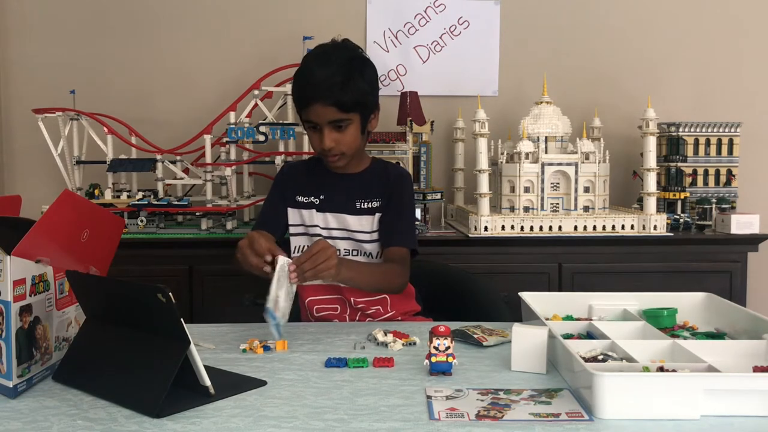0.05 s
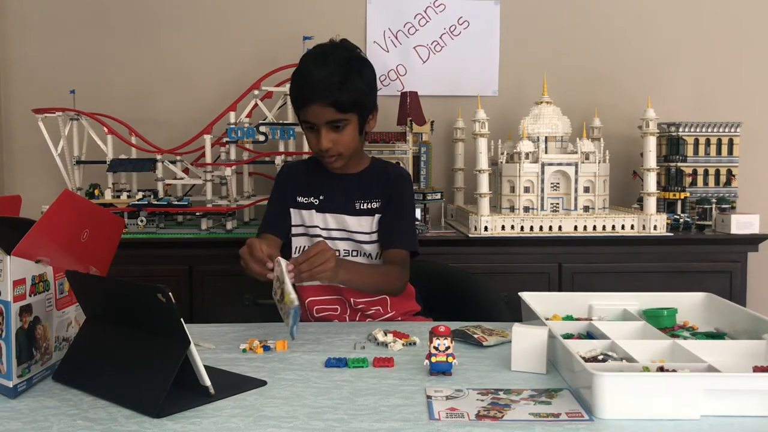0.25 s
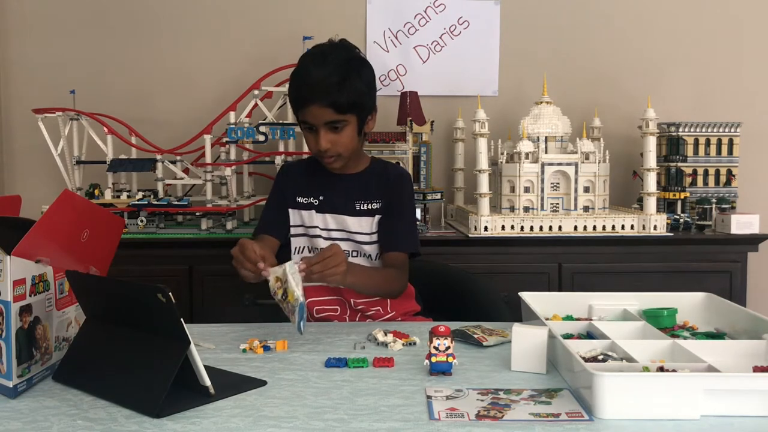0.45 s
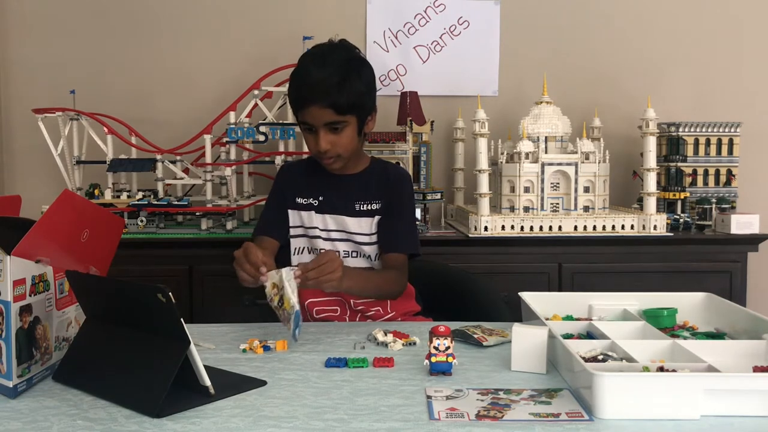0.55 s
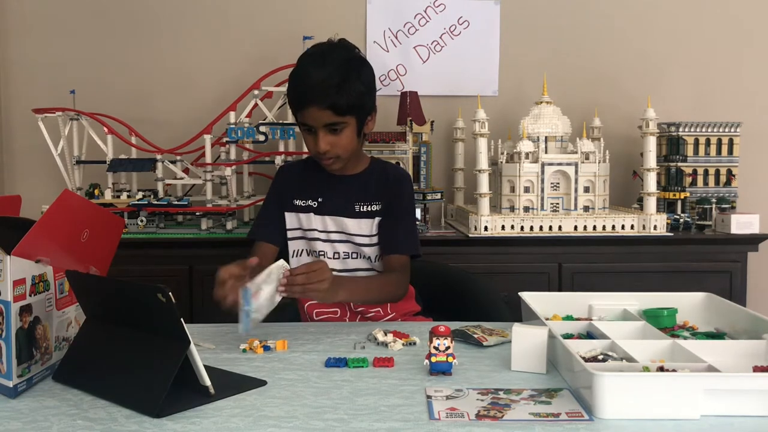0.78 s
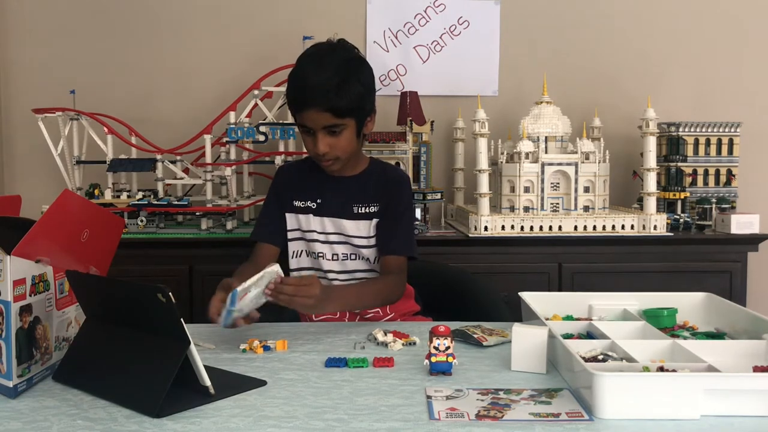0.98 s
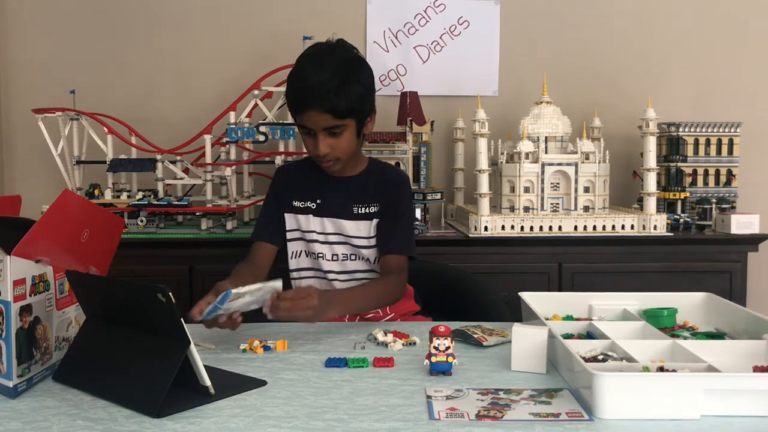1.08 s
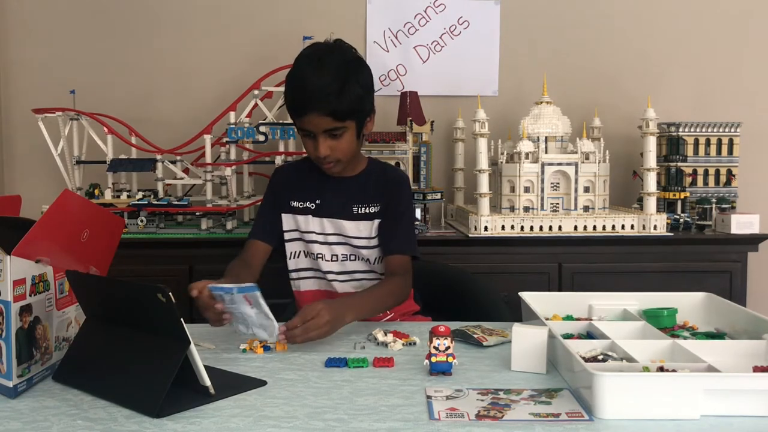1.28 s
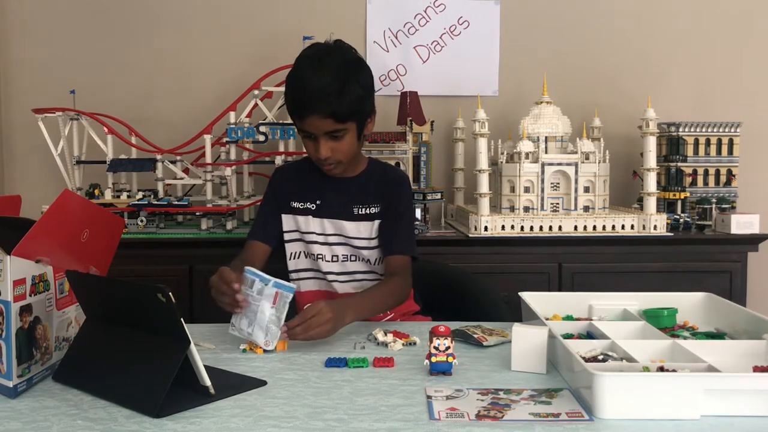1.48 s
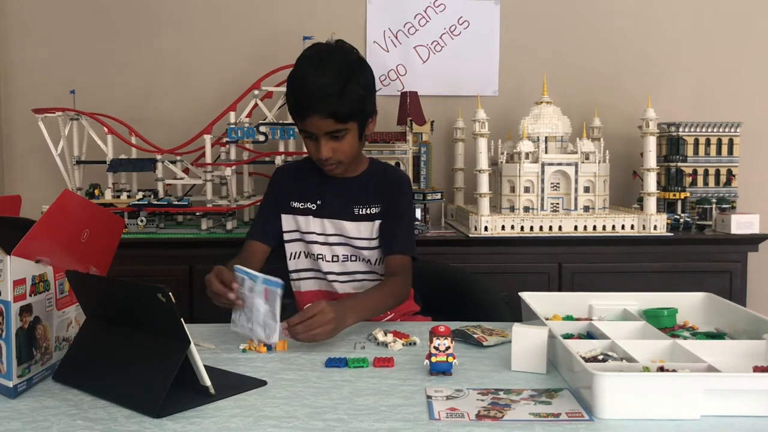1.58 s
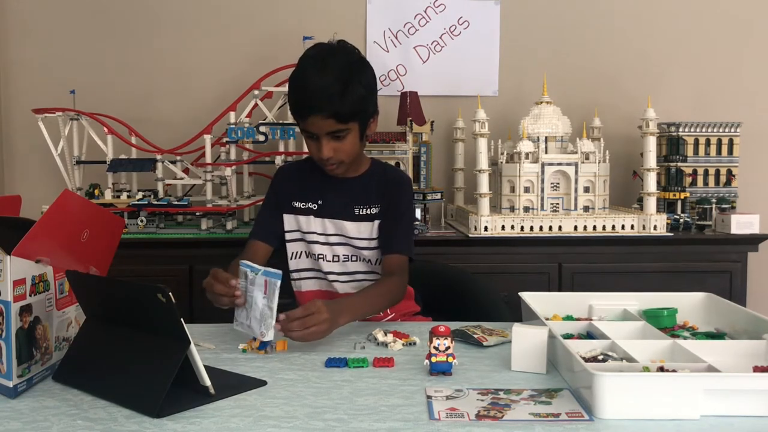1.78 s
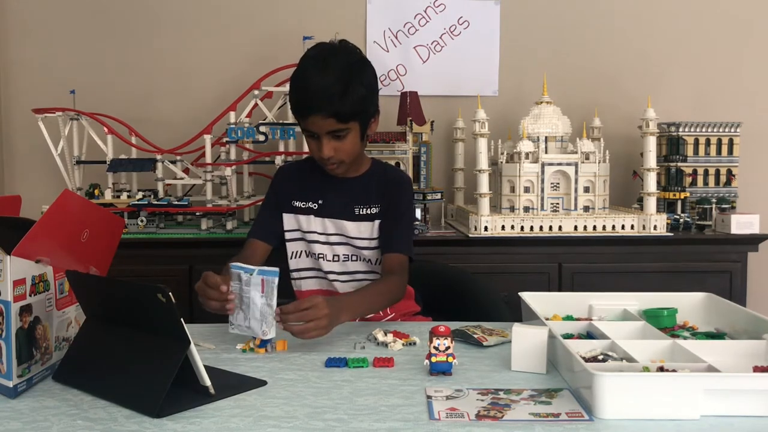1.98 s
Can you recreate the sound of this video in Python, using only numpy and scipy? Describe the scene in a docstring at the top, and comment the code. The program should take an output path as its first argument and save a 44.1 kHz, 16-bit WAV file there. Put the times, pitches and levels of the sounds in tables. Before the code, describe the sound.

Crinkling plastic snaps as a small bag is torn open and turned over with one hollow knock. Toy bricks then spill onto a cloth-covered table with light clicks and soft thuds, picked up with a little room echo.

```python
"""Toy bricks emptied from a bag

A small plastic bag is pulled open, turned over and emptied onto a cloth-covered table. The film
crinkles and buckles in sharp snaps and the seam rips with a pop. The pieces slide out, click together
and thud on the table top, exciting its modes. A quiet living room reverberates after every sound."""
import sys
import numpy as np
from scipy import signal
from scipy.fft import rfft, irfft
from scipy.io import wavfile
from scipy.ndimage import uniform_filter1d

SR = 44100
rng = np.random.default_rng(int(sys.argv[2]) if len(sys.argv) > 2 else 0)


def bounce(signal):
    """Save signal as a 16-bit WAV file at the path given by the first command-line argument."""
    frames = np.transpose(np.atleast_2d(signal))
    limited = np.clip(frames, -1, 1)
    pcm = np.round(limited * 32767).astype(np.int16)
    wavfile.write(sys.argv[1], SR, pcm)


N = 90404
SNAP_DECAY_S, TOP_HZ = 0.0008, 16100


def bag():
    """Buckling and tearing: the film releases elastic energy in pulses and pushes out puffs of air."""
    # time_s, level_db
    handling = [(0, -54.5), (.15, -59.5), (.27, -56), (.34, -53.5), (.42, -42.5), (.5, -49), (.62, -60),
                (.75, -59), (.85, -66.5), (.92, -47.5), (.99, -58.5), (1.07, -52), (1.16, -54.5),
                (1.28, -64), (1.46, -81), (1.53, -54), (2.05, -65)]
    seam = [(.381, -53), (.391, -32), (.403, -38), (.41, -75)]
    # frequency_hz, gain_db
    rustle_colour = [(100, -14), (550, -9), (900, -1), (1600, -2.5), (2800, -7.5), (6500, -12), (9000, -18),
                     (16000, -30.5)]
    rip_colour = [(200, 2), (1200, -3), (3000, 8), (6500, 9), (10000, 1), (15000, 1)]
    # start_s, pitch_hz, body_db, crack_db, sizzle_db
    snaps = [(.0296, 1660, -48.5, -46.5, -48), (.1136, 1470, -51, -60, -58),
             (.148, 1800, -45.5, -47.5, -48), (.2084, 6600, -44, -40, -40.5), (.2442, 1620, -49, -56, -66),
             (.3626, 1600, -42.5, -57, -50), (.3903, 1080, -33.5, -52, -44),
             (.4002, 1745, -23, -29.5, -31.5), (.405, 2040, -28.5, -37, -44),
             (.4335, 930, -35.5, -38.5, -47), (.6928, 4600, -60, -41.5, -45), (.7059, 1150, -43, -74, -66),
             (.7784, 1600, -49, -53, -54.5), (.8702, 3500, -43, -44.5, -49.5), (.8973, 1400, -45, -53, -66),
             (1.009, 1450, -42, -45.5, -57.5), (1.0354, 1330, -38, -63, -56),
             (1.0402, 1700, -37.5, -44.5, -51.5), (1.059, 1650, -42.5, -48, -48.5),
             (1.1427, 3430, -41.5, -39.5, -46), (1.4112, 2850, -51, -52, -73),
             (1.434, 5400, -56.5, -52, -64), (1.4714, 3220, -39, -41.5, -50),
             (1.483, 1590, -43, -49, -51.5)]
    # start_s, pitch_hz, level_db
    puffs = [(.03, 378, -48), (0.4007, 435, -38.5), (.694, 326, -53.5), (1.472, 310, -51.5)]
    rustle = crinkle(rate_hz=800, spread_db=4.5, spectrum=rustle_colour) * along(handling)
    rip = crinkle(rate_hz=5900, spread_db=5.5, spectrum=rip_colour) * along(seam)
    out = rustle + rip + ticks(snaps, SNAP_DECAY_S, ring_s=0.00056, ring_db=-6)
    t = seconds(4096)
    for start_s, pitch_hz, level_db in puffs:
        add(out, start_s, blow(damped_sine(t, pitch_hz, decay_s=0.0032), level_db))
    return out


def bricks():
    """Impact excitation: pieces chatter over the crinkling film, click together and land with clacks."""
    # time_s, level_db
    slide_levels = [(1.5, -89), (1.54, -47), (1.585, -45), (1.625, -46), (1.66, -55), (1.705, -51),
                    (1.73, -43.5), (1.775, -54), (1.83, -60.5), (2.05, -60)]
    # frequency_hz, gain_db
    slide_colour = [(80, -8), (250, 6), (600, 4), (1200, 4), (2500, -2.5), (5000, -3), (8200, -0.5),
                    (10000, -6.5), (15000, -10.5)]
    # start_s, pitch_hz, body_db, crack_db, sizzle_db
    clicks = [(1.5461, 13900, -44, -38.5, -40), (1.5695, 3200, -39.5, -39, -58),
              (1.6115, 11700, -63, -40.5, -34.5), (1.6203, 2690, -43.5, -39.5, -41),
              (1.7144, 5300, -39, -30.5, -29), (1.7668, 8200, -70, -45.5, -43),
              (1.9542, 1630, -43.5, -44.5, -49), (2.0226, 6940, -69, -45, -47)]
    # start_s, level_db
    clacks = [(1.5502, -33), (1.9538, -38)]
    # pitch_hz, level_db, t60_s
    brick_modes = [(1110, -10.5, 0.016), (2210, -7.5, 0.011), (2550, -1.5, 0.016), (4200, -10.5, 0.014),
                   (5770, -4, 0.0047)]
    film = crinkle(rate_hz=1000, spread_db=4.0, spectrum=slide_colour)
    contacts = chatter(rate_hz=1500, ring_s=0.0013, spectrum=slide_colour)
    out = (film + contacts) / np.sqrt(2) * along(slide_levels)
    out += ticks(clicks, decay_s=0.00107, ring_s=0.00039, ring_db=-4.5)
    for start_s, level_db in clacks:
        add(out, start_s, blow(ring(brick_modes, seconds(4096)), level_db))
    return out


def knock(start_s=1.1424, level_db=-28.5):
    """Heavily damped modes: one hollow plastic clack as the bag is turned over."""
    # pitch_hz, level_db, t60_s
    plastic_modes = [(600, -8, .025), (790, -5, .06), (1230, -1, 0.012), (1553, -5.5, .022),
                     (2320, 1.5, .009), (3400, 2, 0.0061)]
    out = np.zeros(N)
    clack = band(ring(plastic_modes, seconds(16384)), low_hz=520, high_hz=3760)
    add(out, start_s, blow(clack, level_db))
    return out


def table(contact_s=0.0026):
    """Cushioned impact: hands and pieces land on the cloth and the table's modes ring with a soft onset."""
    # start_s, level_db
    thuds = [(1.586, -43.5), (1.651, -49), (1.717, -38.5), (1.917, -50.5)]
    # pitch_hz, level_db, t60_s
    table_modes = [(134.3, 1, .2), (165, 0, .15), (235.6, -5, 0.12), (279, -2, .1), (482, -5, 0.11)]
    out, t = np.zeros(N), seconds(16384)
    onset = 1 - np.exp(-t / contact_s)
    for start_s, level_db in thuds:
        add(out, start_s, blow(ring(table_modes, t) * onset, level_db))
    return out


def crinkle(rate_hz, spread_db, spectrum):
    """Incoherent addition: tiny random creases of uneven size give noise bursts whose energies sum."""
    sizes = undb(spread_db * np.minimum(rng.exponential(size=N), 3)) * rng.choice([-1, 1], N)
    creases = sizes * (rng.random(N) < rate_hz / SR)
    energy = signal.lfilter([1], [1, -np.exp(-2 / (SNAP_DECAY_S * SR))], creases ** 2)
    return colour(np.sqrt(energy) * rng.standard_normal(N), spectrum)


def chatter(rate_hz, ring_s, spectrum):
    """Shot noise: stiff pieces touch at random, each contact with its own pitch and strength."""
    out, t = np.zeros(N), seconds(512)
    for when, pitch, chance in rng.random((int(rate_hz * N / SR), 3)):
        strength = -np.log(chance)
        add(out, when * N / SR, strength * damped_sine(t, pitch * TOP_HZ, ring_s))
    return colour(out, spectrum)


def ticks(events, decay_s, ring_s, ring_db):
    """Transient response: each tick is a crack plus one damped resonance, weighted in three bands."""
    # low_hz, high_hz of body, crack and sizzle
    bands = [(740, 2790), (2700, 7020), (8300, 15300)]
    out, t = np.zeros(N), seconds(1024)
    for start_s, pitch_hz, *levels_db in events:
        tick = crack(t, decay_s) + undb(ring_db) * unit(damped_sine(t, pitch_hz, ring_s))
        add(out, start_s, sum(blow(band(tick, *edges), db) for edges, db in zip(bands, levels_db)))
    return out


def crack(t, decay_s):
    """A brief pulse has a broad spectrum: this burst swells for an instant and dies."""
    envelope = t / decay_s * np.exp(-2 * t / decay_s)
    burst = rng.standard_normal(len(t)) * envelope
    for _ in range(2):
        whitened = irfft(np.exp(1j * np.angle(rfft(burst))))
        burst = whitened * np.sqrt(envelope)
    return unit(np.tanh(2 * burst / np.abs(burst).max()))


def room(x, spots, dwell_s=0.011):
    """Convolution: sound comes from each spot in turn, and each spot adds its own reflections."""
    spot = (seconds(N) / dwell_s).astype(int) % spots
    shares = (uniform_filter1d(1. * (spot == k), size=64) for k in range(spots))
    return x + sum(signal.fftconvolve(x * share, reflections())[:N] for share in shares)


def reflections(onset_s=0.0017, early_db=-5.5, early_decay_s=0.0054, modes_db=-19):
    """Room impulse response: early reflections, a diffuse tail and a few lingering resonances."""
    # centre_hz, t60_s, reverberant_to_direct_db
    tail_bands = [(129, 0.45, 1), (370, 0.47, 2.5), (930, 0.51, -4), (1800, 0.82, -3.5), (3460, 0.56, -1),
                  (6940, 0.58, -5), (14100, 0.38, -4.5)]
    # pitch_hz, level_db, t60_s
    room_modes = [(1610, -2.5, 0.25), (1755, -3, 0.39), (2115, -2, 0.44)]
    t = seconds(32768)
    log_hz = log_frequencies(len(t))
    log_centres = np.log([row[0] for row in tail_bands])
    noise_spectrum = rfft(rng.standard_normal(len(t)))
    onset = 1 - np.exp(-(t / onset_s) ** 2)
    response = undb(early_db) * unit(rng.standard_normal(len(t)) * onset * np.exp(-t / early_decay_s))
    for share, (_, t60_s, db) in zip(np.eye(len(tail_bands)), tail_bands):
        fade = unit(onset * undb(-60 * t / t60_s))
        band_noise = irfft(noise_spectrum * np.interp(log_hz, log_centres, share))
        response += undb(db) * fade * band_noise
    return response + undb(modes_db) * unit(onset * ring(room_modes, t))


def air(level_db=-65):
    """Ambient noise: the room's faint steady air, strongest in the bass."""
    # frequency_hz, gain_db
    air_colour = [(30, -10), (50, 1.5), (90, -3.5), (200, -5.5), (1500, -14.5), (4000, -23.5), (16000, -34)]
    return undb(level_db) * colour(rng.standard_normal(N), air_colour)


def ring(modes, t):
    """Free vibration: a sum of decaying modes with random phases."""
    return sum(undb(db) * undb(-60 * t / t60_s) * np.sin(2 * np.pi * (hz * t + rng.random()))
               for hz, db, t60_s in modes)


def damped_sine(t, pitch_hz, decay_s):
    """Impulse response of a damped oscillator."""
    return np.sin(2 * np.pi * pitch_hz * t) * np.exp(-t / decay_s)


def blow(x, level_db, window_s=0.0034):
    """Equivalent level: give a short sound the energy of level_db held for window_s."""
    return unit(x) * undb(level_db) * np.sqrt(window_s * SR)


def along(points):
    """Amplitude envelope through (time_s, level_db) points, silent outside them."""
    time_s, level_db = np.array(points).T
    t = seconds(N)
    return undb(np.interp(t, time_s, level_db)) * (t >= time_s[0]) * (t <= time_s[-1])


def colour(x, spectrum):
    """Spectral shaping by (frequency_hz, gain_db) points, scaled to an rms of one."""
    hz, db = np.array(spectrum).T
    gain = undb(np.interp(log_frequencies(len(x)), np.log(hz), db))
    return unit(irfft(rfft(x) * gain, len(x))) * np.sqrt(len(x))


def band(x, low_hz, high_hz):
    """Third-order band-pass filter."""
    return signal.sosfilt(signal.butter(3, [low_hz, high_hz], "band", fs=SR, output="sos"), x)


def add(out, start_s, x):
    """Superpose a sound from start_s on."""
    i = int(start_s * SR)
    out[i:i + len(x)] += x[:len(out) - i]


def undb(db):
    """Decibels to amplitude ratio."""
    return 10 ** (np.asarray(db) / 20)


def unit(x):
    """Scale to an energy of one."""
    return x / np.sqrt(np.sum(x ** 2) + 1e-18)


def seconds(size):
    """Time axis."""
    return np.arange(size) / SR


def log_frequencies(size):
    """Logarithm of each spectral bin's frequency."""
    return np.log(np.maximum(np.fft.rfftfreq(size, 1 / SR), 1))


def scene():
    """Superposition: bag, bricks and table sound in the room over its steady air, in one channel."""
    return (air() + room(bag() + bricks(), spots=5) + room(table() + knock(), spots=1))[None]


def record(dry, bass_cut_hz=36):
    """Band limiting: filters remove the deepest bass and the highest treble."""
    x = signal.sosfilt(signal.butter(5, bass_cut_hz, "high", fs=SR, output="sos"), dry)
    return signal.sosfilt(signal.ellip(8, .2, 70, TOP_HZ, fs=SR, output="sos"), x)


dry = scene()
out = record(dry)
bounce(out)
```